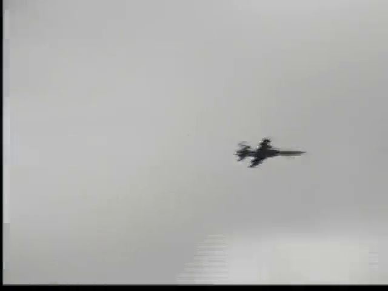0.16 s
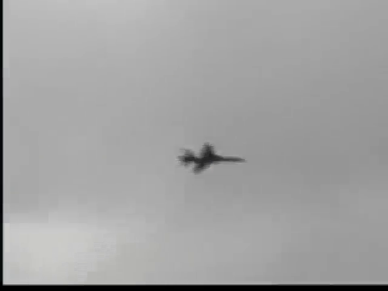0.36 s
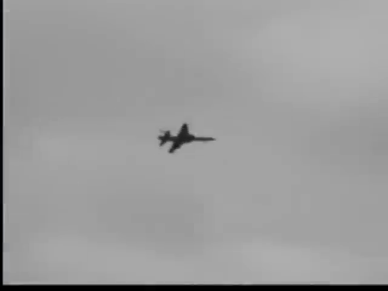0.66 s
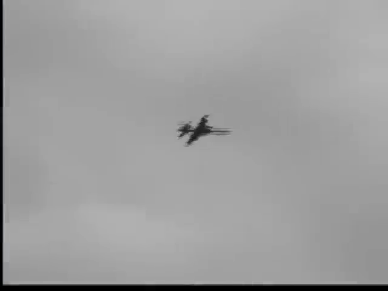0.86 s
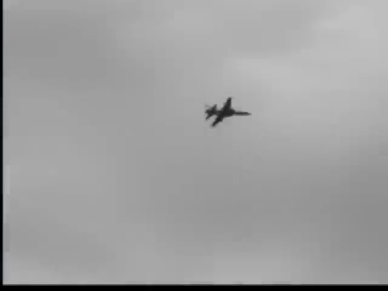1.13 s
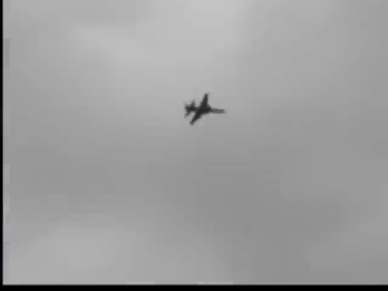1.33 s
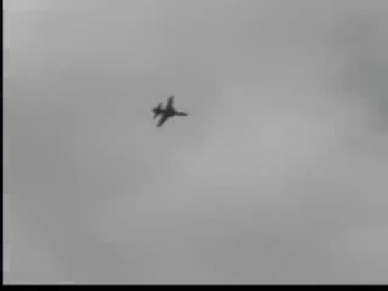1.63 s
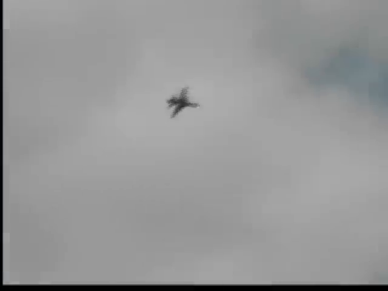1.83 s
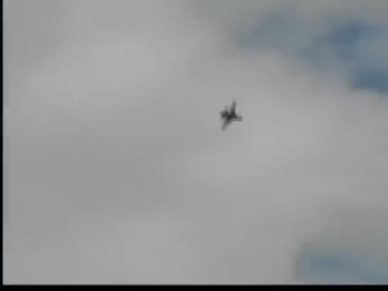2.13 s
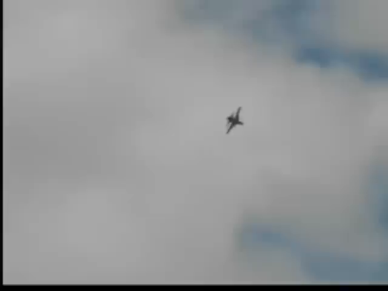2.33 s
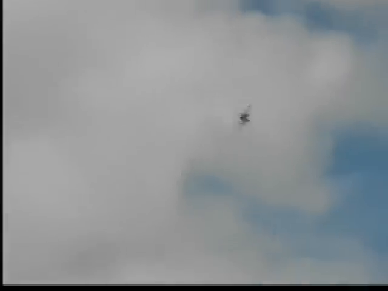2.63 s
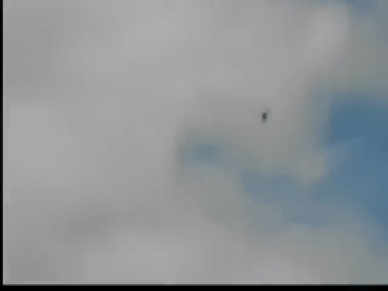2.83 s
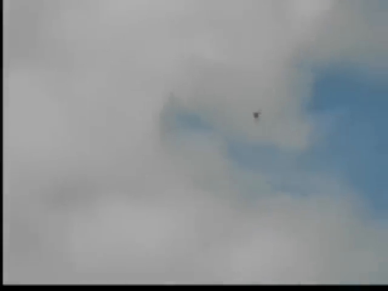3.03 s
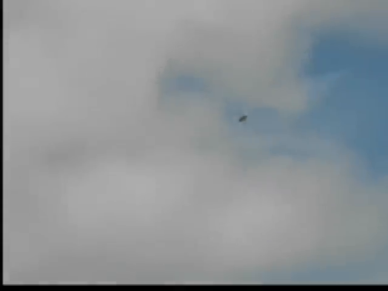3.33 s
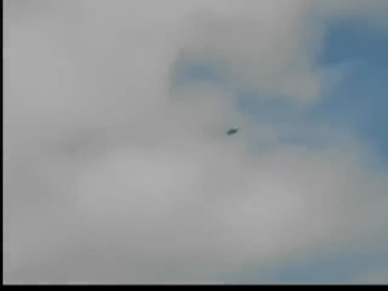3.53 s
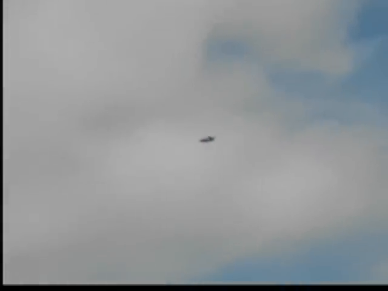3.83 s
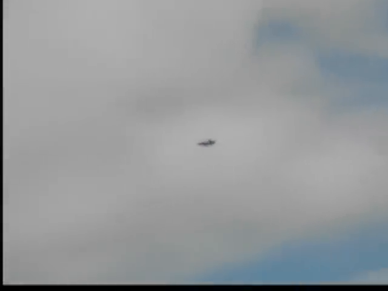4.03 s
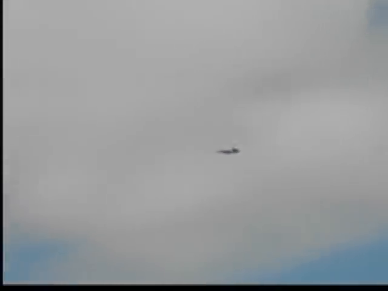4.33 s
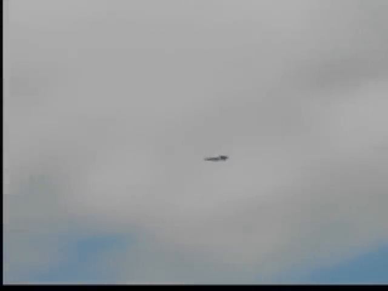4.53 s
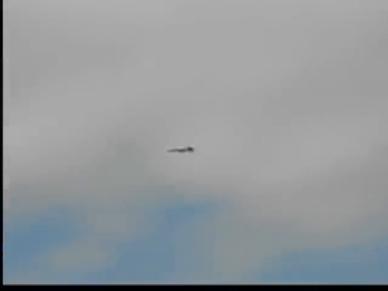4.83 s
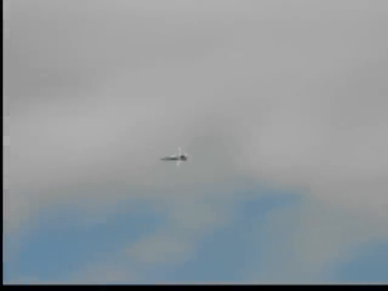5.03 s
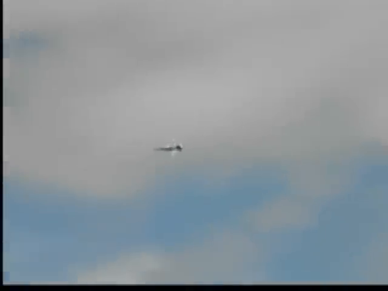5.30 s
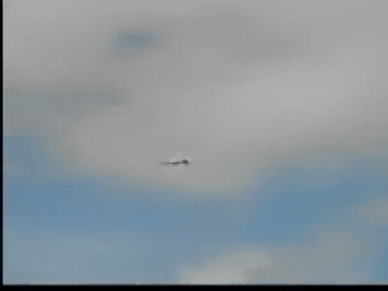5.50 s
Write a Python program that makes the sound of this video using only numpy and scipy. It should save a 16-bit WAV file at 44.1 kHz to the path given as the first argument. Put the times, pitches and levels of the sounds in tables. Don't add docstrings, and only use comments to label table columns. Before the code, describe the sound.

Rushing, fluttering jet exhaust roar with a hollow sweeping tone recedes, thins to a faint rumble under wind, and grows again as the aircraft returns.

```python
import sys
import numpy as np
from scipy import signal
from scipy.fft import rfft, irfft, next_fast_len
from scipy.io import wavfile
from scipy.ndimage import uniform_filter1d, map_coordinates

SR = 44100
rng = np.random.default_rng(int(sys.argv[2]) if len(sys.argv) > 2 else 0)


def wrap_up_sound(samples):
    columns = np.atleast_2d(samples).T
    tamed = np.clip(columns, -1, 1)
    steps = np.round(tamed * 32767).astype(np.int16)
    wavfile.write(sys.argv[1], SR, steps)


def decibels_to_gain(level_db):
    exponent = np.asarray(level_db, float) / 20
    return 10 ** exponent


N = 249606
FRAME, HOP = 512, 128

# (time [s], level [dB])
WIND_LEVEL = [(0, -54.5), (1.2, -47.5), (2.9, -52), (3.7, -41.5), (5.66, -42.5)]
# (frequency [Hz], density [dB/Hz])
WIND_SPECTRUM = [(15, -51), (25, -34), (54, -23), (82, -6.5), (107, 4.5), (216, -3.5), (245, -29),
                 (322, -13), (500, -30), (650, -61), (1100, -120)]
# (time [s], half length [s], level [dB])
GUSTS_AND_LULLS = [(0.66, 0.11, -2.9), (0.82, 0.05, -2), (1.54, 0.14, -11), (2.34, 0.05, -2),
                   (2.46, 0.039, 9), (2.62, 0.05, 3.2), (2.94, 0.069, -3.5), (3.16, 0.1, -3.3),
                   (3.74, 0.045, -1), (3.94, 0.14, -3.3), (4.58, 0.064, -6.5), (5.12, 0.056, -5)]
# (start [s], end [s], level [dB])
BUZZES = [
    (2.8, 3.13, -73),
    (3.31, 3.68, -75.5),
    (3.82, 4.15, -74),
    (4.33, 4.62, -72.5),
    (5.0, 5.13, -99),
]
# (time [s], frequency [Hz], level [dB])
CREAK = [
    (3.165, 570, -62),
    (3.19, 490, -34.5),
    (3.22, 470, -37),
    (3.26, 398, -54),
]
# (time [s], frequency [Hz], level [dB])
BLADE_WHINE = [(3.45, 8550, -99), (3.6, 8800, -91), (3.8, 9150, -89), (4.05, 9400, -86), (4.25, 9650, -91),
               (4.45, 9900, -85), (4.6, 10100, -99)]
# (time [s], loudness [dB], brightness from nozzle angle [dB])
ROAR = [(0.0, -22, -0.7), (0.3, -27.5, 0.5), (0.6, -21.5, 1.34), (1.3, -26, 2.5), (1.7, -31.5, 2.2),
        (2.4, -33.5, 3), (2.75, -40, -2.5), (3.4, -38.5, -5.5), (3.95, -41, -9), (4.25, -39, -1.6),
        (4.9, -30.5, -3.5), (5.25, -31.5, -4), (5.66, -31.5, 4)]
# (low edge [Hz], high edge [Hz])
BANDS_HZ = [
    (250, 850),
    (850, 1700),
    (1700, 3500),
    (3500, 6900),
]
# (offset [dB], share of loudness [dB/dB], share of brightness [dB/dB])
BAND_RESPONSE = [
    (-37, 0.05, .01),
    (0.33, 1.014, 0.0054),
    (1.9, 1.016, 1.44),
    (-13, 0.98, 1.12),
]
# (frequency [Hz], band [index])
BAND_REACH = [(400, 0), (720, 0), (980, 1), (1300, 1), (2450, 2), (4500, 3)]
# (frequency [Hz], density [dB/Hz])
JET_SPECTRUM = [(60, -25.5), (120, -16), (300, -6.5), (480, -6.5), (720, -6), (1100, 0.5), (2000, -3),
                (3000, -8.5), (4200, -14.5), (6500, -23), (7300, -33), (9000, -32), (11000, -35.5),
                (13000, -56)]
# (frequency [Hz], width [Hz], level [dB])
TAILPIPE = [(1033, 58, 5), (1492.6, 81, 7), (1956, 71, 1), (2508, 56, 1), (2948, 140, -0.5),
            (3365, 120, -7)]
# (time [s], delay [ms])
GROUND_PATH = [(0, 4.09), (.6, 4.08), (.95, 3.99), (1.6, 3.66), (2.3, 3.33), (3.0, 3.07), (3.7, 2.89),
               (4.3, 2.72), (5.1, 2.6), (5.66, 2.56)]
# (time [s], pitch factor [1])
DOPPLER = [(0, 1.012), (.5, 1.0), (1.1, .992), (1.45, .968), (2, .95), (3.2, .95), (4.4, 1.02),
           (5.66, 1.08)]
ECHO_LAG_RAD = (-.35, 1.2)
# (time [s], half length [s], level [dB], centre [Hz])
EDDIES = [(0.101, 0.038, 6, 1700), (0.213, 0.035, 6.5, 1700), (0.244, 0.063, -7, 5500),
          (0.35, 0.064, 7.5, 1690), (0.491, 0.049, 5.5, 1700), (0.548, 0.031, 2.5, 5500),
          (0.83, 0.038, -4.5, 1100), (0.863, 0.059, -2, 3500), (0.981, 0.034, 6.5, 3500),
          (1.218, 0.041, 4.5, 1100), (1.295, 0.035, 3, 5500), (1.437, 0.11, 3.5, 2500),
          (1.569, 0.029, -5.5, 3500), (1.858, 0.049, 9.5, 3570), (2.001, 0.049, -7.5, 4000),
          (2.114, 0.052, 4.5, 3500), (2.25, 0.044, -2.5, 5500), (2.34, 0.04, 4.5, 5500),
          (2.447, 0.035, 8.5, 5540), (2.575, 0.095, -3.5, 3440), (2.763, 0.087, -5.5, 1100),
          (3.13, 0.089, 12, 5240), (3.56, 0.23, -5.5, 1700), (4.192, 0.13, 5.5, 5500),
          (4.66, 0.27, -2.5, 1740), (4.87, 0.49, 5, 450), (4.898, 0.05, 2.5, 4500),
          (5.042, 0.035, -4.5, 5500), (5.406, 0.13, 9.5, 5500), (5.55, 0.078, 7, 5600)]
# (frequency [Hz], side re mid [dB])
PORT_SIDE = [(100, -4), (350, -23), (630, -7), (1130, -10.5), (2040, -10.5), (3200, -6.5), (4500, -10),
             (7000, -15), (12000, -0.5)]
# (frequency [Hz], left re right [dB])
PORT_TILT = [(60, -7), (110, -9), (190, 1), (350, -2), (630, -2.5), (1130, -0.5), (2040, -0.5),
             (3660, -0.5), (6590, -4.5), (11900, 5.5)]
# (time [s], frequency [Hz], level [dB])
DRIVE_WHISTLE = [(2.6, 7960, -104), (2.8, 7870, -92), (4.3, 7800, -88), (4.45, 7870, -104)]
# (frequency [Hz], level [dB])
GATE_TREBLE = [(6000, -108), (7400, -101), (7900, -100), (8300, -100), (9500, -103), (10500, -95),
               (11500, -93.5), (12500, -101)]
# (frequency [Hz], side re mid [dB])
GATE_SIDE = [(100, -38), (300, -27.5), (600, -12), (1200, -13.5), (2100, -13), (2600, -16), (3800, -20.5),
             (4200, -7), (4800, -11.5), (5500, -8.5), (6900, -11), (7600, -10), (11000, -6.5)]
# (time [s], half length [s], easing [dB])
GATE_EASING = [
    (0.96, 0.065, 2),
    (1.278, 0.036, 0),
    (3.545, 0.038, 25),
    (4.4, 0.035, 14),
    (4.467, 0.021, 20),
    (4.677, 0.045, 5.5),
    (5.267, 0.035, 5),
]

EDDY_OCTAVES = 1.19
STEEP_MS, GRAZING_MS = 4.09, 2.56
TOP_DB, TOP_PER_HISS, TOP_GRAZING_DB = 3, -0.32, -6
RING_DB, BANK_S, RING_FADE_DB_PER_S = -1.4, 1.36, -17


def evened(x):
    return x / np.sqrt(np.mean(x ** 2) + 1e-20)


def read(points, hz):
    f, value = np.transpose(points)
    return np.interp(np.log(hz + 1), np.log(f + 1), value)


def columns(rows, t):
    s, *values = np.transpose(rows)
    return [np.interp(t, s, v) for v in values]


def bumps(rows, t):
    return np.array([db * np.exp(-((t - s) / half) ** 2) for s, half, db, *_ in rows])


def drift(hz):
    return evened(signal.lfilter(*signal.butter(2, hz, fs=SR), rng.standard_normal(N)))


def resonate(x, hz, width_hz):
    turn = np.exp(2j * np.pi * np.cumsum(hz) / SR)
    r = np.exp(-np.pi * width_hz / SR)
    return 2 * (turn * signal.lfilter([1 - r], [1, -r], x / turn)).real


def tone(rows, waver_hz, waver_db):
    t = np.arange(N) / SR
    hz, db = columns(rows, t)
    turns = np.cumsum(hz + waver_hz * drift(60)) / SR
    sounding = (t > rows[0][0]) & (t < rows[-1][0])
    return sounding * decibels_to_gain(db + waver_db * drift(25)) * np.sqrt(2) * np.sin(2 * np.pi * turns)


def microphone_hiss():
    hiss = decibels_to_gain(-62) * (rng.standard_normal(N) + 0.2 * rng.standard_normal((2, N)))
    return signal.lfilter(*signal.butter(1, 6000, fs=SR), hiss)


def wind():
    t = np.arange(N) / SR
    hz = np.fft.rfftfreq(N, 1 / SR)
    rumble = evened(irfft(rfft(rng.standard_normal((2, N))) * decibels_to_gain(read(WIND_SPECTRUM, hz)), N))
    lumps_db = 2.4 * np.array([drift(12), drift(17)]) + 2.0 * drift(11.0)
    gusts_db = 0.8 * bumps(GUSTS_AND_LULLS, t).sum(0)
    port_db = np.array([[1.5], [3.5]])
    return rumble * decibels_to_gain(columns(WIND_LEVEL, t)[0] + gusts_db + lumps_db + port_db)


def grasshopper():
    t = np.arange(N) / SR
    clicks = rng.standard_normal(N) * (rng.random(N) < 900 / SR)
    wing_hz = np.full(N, 11500.0)
    wing = evened(resonate(resonate(clicks, wing_hz, 700), wing_hz, 700))
    ramp_s = 0.042
    bursts = [decibels_to_gain(db) * np.clip(np.minimum(t - s, end - t) / ramp_s, 0, 1) for s, end, db in BUZZES]
    return wing * sum(bursts)


def grip_creak():
    return tone(CREAK, waver_hz=5.6, waver_db=-3.0)


def blade_whine():
    return tone(BLADE_WHINE, waver_hz=40, waver_db=5)


def grazing(late_ms):
    return (STEEP_MS - late_ms) / (STEEP_MS - GRAZING_MS)


def tailpipe():
    t = np.arange(N) / SR
    ring_db = RING_DB + RING_FADE_DB_PER_S * np.maximum(t - BANK_S, 0)
    doppler = columns(DOPPLER, t)[0]
    noise = rng.standard_normal(N)
    rings = 0
    for hz, width_hz, db in TAILPIPE:
        narrow = resonate(noise, hz * doppler, width_hz)
        rings = rings + decibels_to_gain(db + 1.4 * drift(9.9)) * resonate(narrow, hz * doppler, 2.17 * width_hz)
    return noise + decibels_to_gain(ring_db) * rings


def exhaust():
    late_ms = columns(GROUND_PATH, np.arange(N) / SR)[0]
    graze = grazing(late_ms)
    share = 0.61 + (0.72 - 0.61) * graze
    crisp = 1 + (0.22 - 1) * graze
    shake_ms = 0.011 + (0.033 - 0.011) * graze
    lag_rad = ECHO_LAG_RAD[0] + (ECHO_LAG_RAD[1] - ECHO_LAG_RAD[0]) * graze
    direct = tailpipe()
    size = next_fast_len(N)
    hz = np.fft.rfftfreq(size, 1 / SR)
    one_sided = 2 * rfft(direct, size)
    dull, bright = (np.fft.ifft(one_sided / (1 + (hz / edge) ** 3), size)[:N] for edge in (1600, 5000))
    grass = dull + np.clip(crisp, 0, 1) * (bright - dull)
    late = (late_ms + shake_ms * drift(4.6)) * SR / 1000
    lagged = (grass * np.exp(-1j * lag_rad)).real
    echo = map_coordinates(lagged, [np.arange(N) - late], order=2, mode="mirror")
    return direct + np.clip(share, 0, 1) * echo


def roar_db(t):
    offset_db, loud, bright = np.transpose(BAND_RESPONSE)[:, :, None]
    loud_db, bright_db = columns(ROAR, t)
    centre_hz = np.sqrt(np.prod(BANDS_HZ, axis=1))[:, None]
    octaves = np.log2(centre_hz / np.transpose(EDDIES)[3])
    eddies_db = np.exp(-(octaves / EDDY_OCTAVES) ** 2) @ bumps(EDDIES, t)
    return offset_db + loud * loud_db + bright * bright_db + eddies_db


def air_flutter_db(hz, t):
    small, large = rng.standard_normal((2, len(t), len(hz)))
    small = evened(uniform_filter1d(uniform_filter1d(small, size=14, axis=0), size=8, axis=1)).T
    large = evened(uniform_filter1d(uniform_filter1d(large, size=60, axis=0), size=12, axis=1)).T
    broad = drift(13.6)[np.minimum(np.arange(len(t)) * HOP, N - 1)]
    depth_db = read([(200, 0.37), (1500, 0.73), (4500, 1.7), (11000, 1.25)], hz)[:, None]
    return depth_db * (1.45 * small + 0.94 * large + 0.51 * broad)


def jet():
    hz, t, z = signal.stft(exhaust(), SR, nperseg=FRAME, noverlap=FRAME - HOP)
    bands_db = roar_db(t)
    hiss_db = bands_db[-1] - bands_db[1] + 15.5
    air_db = TOP_DB + TOP_PER_HISS * hiss_db + TOP_GRAZING_DB * grazing(columns(GROUND_PATH, t)[0])
    top = np.clip((hz[:, None] - 6500) / 3500, 0, 2)
    z = z * decibels_to_gain(read(JET_SPECTRUM, hz)[:, None] + air_flutter_db(hz, t) + top * air_db)

    power = np.array([(abs(z[(hz >= lo) & (hz < hi)]) ** 2).sum(0) for lo, hi in BANDS_HZ]) * 4 / 3
    lift_db = bands_db - 10 * np.log10(uniform_filter1d(power, size=22, axis=1))
    blend = np.maximum(1 - abs(read(BAND_REACH, hz) - np.arange(len(BANDS_HZ))[:, None]), 0)
    z = z * decibels_to_gain(blend.T @ lift_db)

    phase = 2 * np.pi * rng.standard_normal(z.shape)
    side = z * decibels_to_gain(read(PORT_SIDE, hz))[:, None] * np.exp(1j * phase)
    lean = decibels_to_gain(read(PORT_TILT, hz) / 2)[:, None]
    ports = [(z + side) * lean, (z - side) / lean]
    return signal.istft(ports, SR, nperseg=FRAME, noverlap=FRAME - HOP)[1][:, :N]


def scene():
    small = blade_whine() + grip_creak() + grasshopper()
    return jet() + wind() + small + microphone_hiss()


def band_gate(x):
    hz, t, z = signal.stft([x[0] + x[1], x[0] - x[1]], SR, nperseg=2048, noverlap=1536)
    power = uniform_filter1d(abs(z / 2) ** 2, size=5, axis=2) + 1e-20
    band_db = 10 * np.log10(uniform_filter1d(power, size=5, axis=1))
    band_db = band_db[:, np.arange(len(hz)) // 5 * 5]
    loud_db = 10 * np.log10(power[0].sum(0))
    quiet_db = read(GATE_TREBLE, hz)[:, None] + 0.47 * (loud_db + 35.5)
    mask_db = 10 * np.log10(uniform_filter1d(power[0], size=48, axis=0)) + read(GATE_SIDE, hz)[:, None]
    mask_db = mask_db - bumps(GATE_EASING, t).sum(0)
    heard = band_db[0] > np.where(hz[:, None] > 5000, quiet_db, -200)
    z = z * np.array([heard, heard & (band_db[1] > mask_db)])
    mid, side = signal.istft(z, SR, nperseg=2048, noverlap=1536)[1][:, :N]
    return np.array([mid + side, mid - side]) / 2


def top_cut(x):
    return signal.sosfilt(signal.butter(12, 12460, fs=SR, output="sos"), x)


def record(dry):
    x = signal.sosfilt(signal.butter(3, 70, "high", fs=SR, output="sos"), dry)
    x = signal.sosfilt(signal.butter(3, [7450, 8300], "bandstop", fs=SR, output="sos"), x)
    x = signal.sosfilt(signal.butter(3, 11500, fs=SR, output="sos"), x)
    x = x + tone(DRIVE_WHISTLE, waver_hz=30, waver_db=5)
    mix = band_gate(x)
    return top_cut(mix)


dry = scene()
out = record(dry)
wrap_up_sound(out)
```